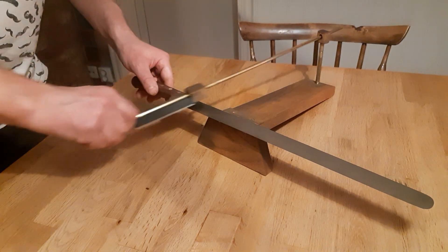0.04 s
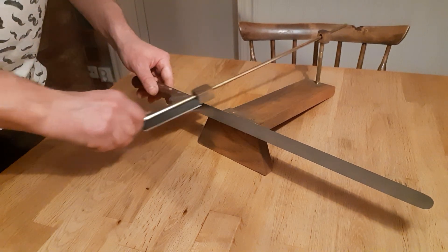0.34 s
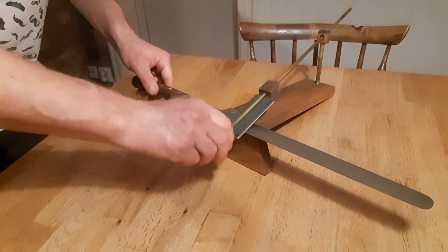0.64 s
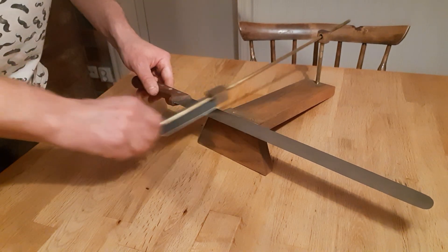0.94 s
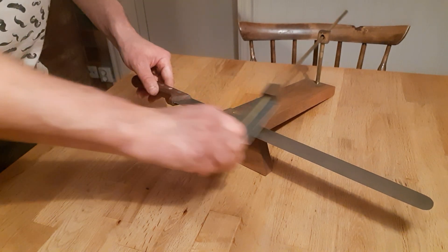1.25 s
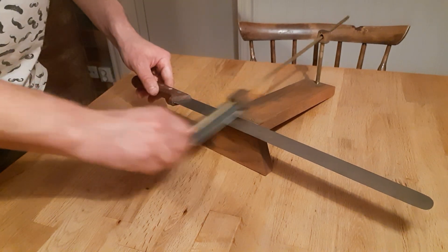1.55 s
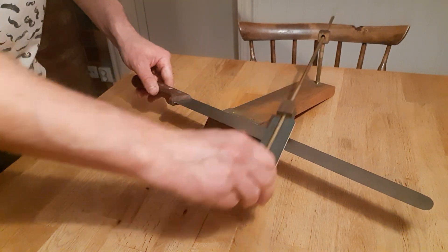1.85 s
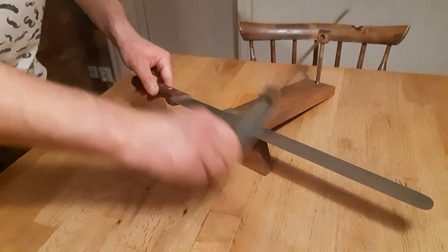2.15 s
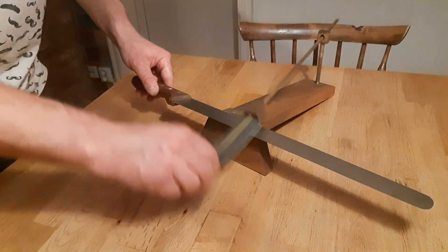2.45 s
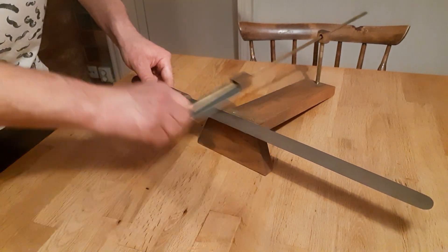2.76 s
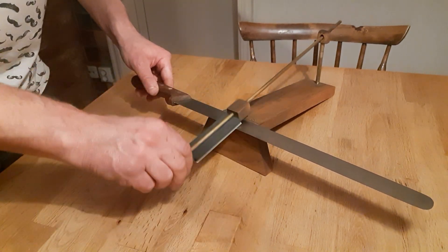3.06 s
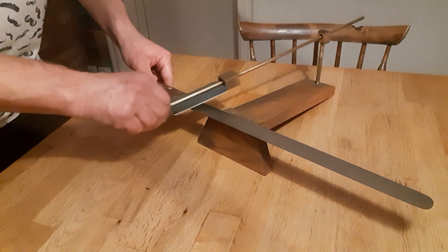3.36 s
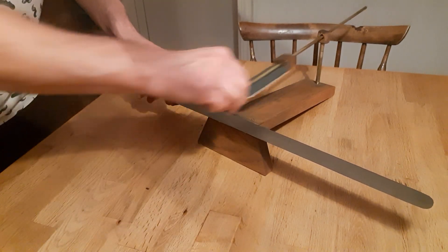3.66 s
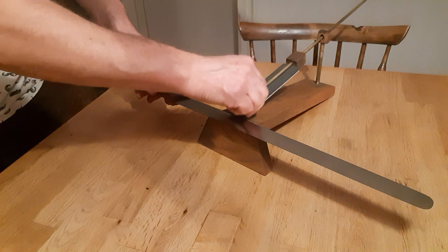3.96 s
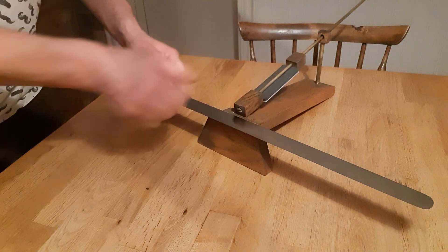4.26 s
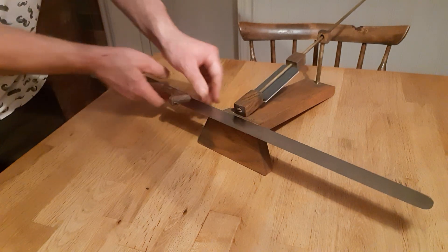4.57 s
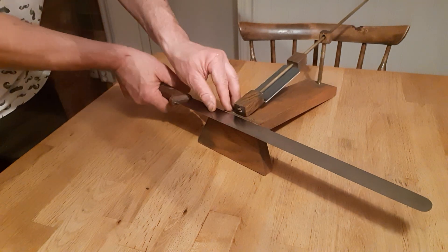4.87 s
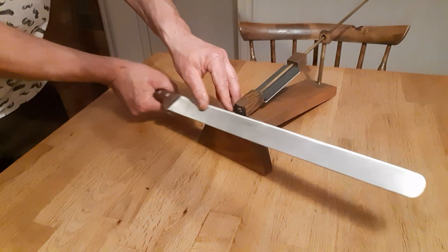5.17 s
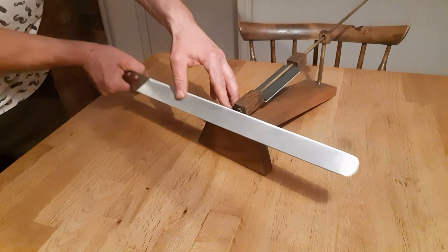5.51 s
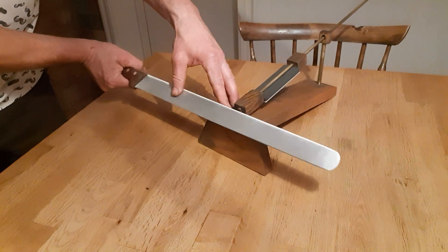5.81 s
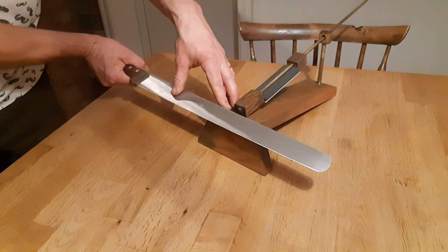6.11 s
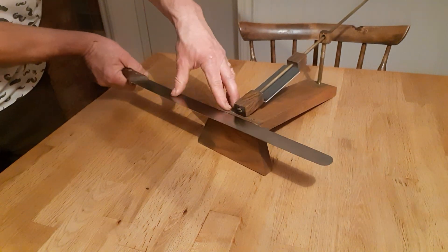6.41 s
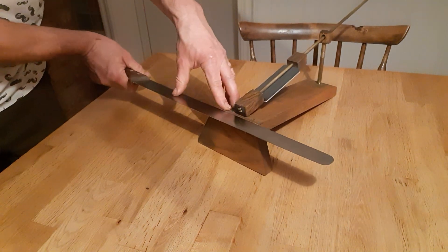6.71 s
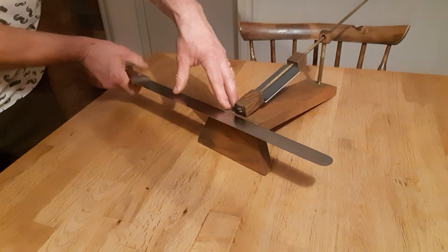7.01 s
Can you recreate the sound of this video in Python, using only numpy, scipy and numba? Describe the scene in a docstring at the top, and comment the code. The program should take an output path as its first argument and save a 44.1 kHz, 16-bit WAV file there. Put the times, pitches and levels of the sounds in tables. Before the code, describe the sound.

A sharpening stone knocks onto a long knife in a wooden jig and scrapes along the edge in quick, gritty strokes, with a slight steel ring and faint squeaks from its guide rod. About halfway through, the strokes end in a sharp clack. The stone is put down, and the knife is shifted with light knocks and rubs. The small room hums faintly, and the brighter sounds sit mostly left.

```python
"""A soft rub and a wooden knock, then a stone on a guide rod lands on a long knife held in a wooden jig
and rasps along the edge: four single strokes, two there and back. The grit hisses and sets the blade
ringing, the rod squeaks, the jig rocks on the kitchen table. The stone is parked, and the knife is lifted
and set back with light knocks. The small room hums faintly; the treble sits mostly on the left."""
import sys
import numpy as np
from scipy import signal
from scipy.fft import rfft, irfft, next_fast_len
from scipy.io import wavfile
from scipy.ndimage import map_coordinates
from numba import njit

SR = 44100
rng = np.random.default_rng(int(sys.argv[2]) if len(sys.argv) > 2 else 0)


def to_wav(s):
    """Save 16-bit WAV."""
    ch = np.atleast_2d(s).T  # columns
    pcm = np.round(np.clip(ch, -1, 1) * 32767)  # PCM
    wavfile.write(sys.argv[1], SR, pcm.astype(np.int16))


N = 310905
T = np.arange(N) / SR

# leftward lean of knocks, rubs and squeaks: f/Hz, left minus right/dB
JIG_PAN = [(60, -7.5), (180, 0.5), (300, 0.5), (450, 3.5), (750, 7.5), (1500, 9), (2500, 17), (4000, 20),
           (6000, 42), (14000, 13)]


def scrape(contact_q=3.0, contact_db=9.5, rasp_trim_db=-2, room_db=-6):
    """Grit hisses on the edge and rasps through the blade, whose resonance slides with the contact."""
    # tone of the grit on the edge: f/Hz, gain/dB
    hiss_eq = [(3000, -39), (7500, -35.5), (8300, -19), (9200, -10.5), (12400, -13), (13800, -6),
               (15600, -2), (17000, -5)]
    # tone of the blade's body: f/Hz, gain/dB
    rasp_eq = [(60, -29), (180, 5.5), (280, 13.5), (550, 3.5), (1000, 3), (1500, -10), (2000, -1),
               (2600, -4), (4000, -5), (5600, -1), (6400, -7.5), (7200, -24), (9000, -50)]
    # leftward lean of the scrape: f/Hz, left minus right/dB
    pan = [(100, 4), (400, 1.5), (1000, 11), (2500, 16.5), (5000, 28), (15000, 31)]
    hiss_gain, rasp_gain, contact_hz = hand()
    grains = grit()
    blade = colour(grains, rasp_eq)
    blade = blade + undb(contact_db) * np.array([resonate(x, contact_hz, contact_q) for x in blade])
    hiss = hiss_gain * unit(stereo(colour(grains, hiss_eq), pan))
    rasp = undb(rasp_trim_db) * rasp_gain * unit(stereo(blade, pan))
    direct = hiss + rasp
    tail = room_tail()
    reverb = signal.fftconvolve(direct, tail / np.linalg.norm(tail[0]), axes=1)[:, :N]
    return direct + undb(room_db) * reverb


def hand(hiss_arch_db=2.7, flick_lead_s=0.053, flick_s=0.013, release_s=0.012):
    """Each pass touches down, arches with the hand's speed, ends in a brisk flick and lifts off."""
    # passes of the stone; a swell runs from start to end, the arch peaks at mid-stroke:
    # t/s, length/s, touch-down/s, hiss/dB, hiss swell/dB, rasp/dB, rasp swell/dB, rasp arch/dB,
    # hiss flick/dB, starting resonance/Hz, final resonance/Hz
    strokes = [ (0.393, 0.31, 0.001, -55.5, -2.5, -61, -20.5, 2, 2, 2310, 4660),
               (0.977, 0.25, 0.001, -53, -7.5, -61.5, -17.5, 2, 4, 2690, 5600),
               (1.484, 0.27, 0.001, -60, 4, -66.5, 4.5, 5, 3.5, 3500, 4700),
               (1.996, 0.06, 0.001, -61.5, -1, -57, -8.5, -3.5, -2, 2130, 2500),
               (2.064, 0.22, 0.001, -59, 6, -64, 8, 8.5, -5, 4200, 5500),
               (2.474, 0.098, 0.0032, -59, -8, -64.5, -10.5, 3.5, 3, 4070, 6030),
               (2.58, 0.26, 0.028, -59.5, 5.5, -63.5, 11.5, 6.5, 7, 6060, 3180),
               (2.888, 0.19, 0.002, -53, -12.5, -68, -13.5, 7, 3, 2840, 4800),
               (3.085, 0.21, 0.025, -64.5, 10.5, -64, 12, 1, 0, 4900, 2860),
               (3.286, 0.022, 0.004, -39.5, -15, -50, 8, 13.5, 0, 2700, 2690), ]
    hiss, rasp = np.zeros((2, N))
    contact_hz = np.full(N, float(strokes[0][-2]))
    for (s, length, touch_s, hiss_db, hiss_swell, rasp_db, rasp_swell, arch_db,
         flick_db, from_hz, to_hz) in strokes:
        along = np.clip((T - s) / length, 0, 1)
        past_end = T - s - length
        touching = np.clip((T - s) / touch_s, 0, 1) * np.exp(-np.maximum(past_end, 0) / release_s)
        speed = np.sin(np.pi * along)
        flick = np.exp(-((past_end + flick_lead_s) / flick_s) ** 2)
        hiss += touching * undb(hiss_db + hiss_swell * along + hiss_arch_db * speed + flick_db * flick)
        rasp += touching * undb(rasp_db + rasp_swell * (along - .5) + arch_db * speed)
        contact_hz = np.where(T >= s, from_hz * (to_hz / from_hz) ** along, contact_hz)
    pressure = undb(3.15 * wander(rate_hz=35.24))  # the hand bears down unevenly
    return hiss * pressure, rasp * pressure, contact_hz


def grit(grain_db=2.6, cap_db=13, judder_db=0.8, patchy_db=3.9, spacing_hz=130, dwell_s=0.037):
    """Fine grains merge into hiss; close modes of stone and blade swell and fade as the contact moves."""
    # grain loudness is capped so the hiss stays even, without single ticks
    grain = np.minimum(grain_db * rng.exponential(size=N), cap_db)
    bites = rng.standard_normal((2, N)) * undb(grain + judder_db * wander(rate_hz=150))
    hz, s, spectra = signal.stft(bites, SR, nperseg=1024)
    places = np.meshgrid(hz / spacing_hz, s / dwell_s, indexing='ij')
    coupling = map_coordinates(rng.standard_normal((512, 512)), places, order=1, mode='wrap')
    return signal.istft(spectra * undb(patchy_db * coupling), SR, nperseg=1024)[1][:, :N]


def knocks(trims_db=(-1, -4, -1)):
    """The stone lands on the edge and is parked; the blade is lifted and set back on its rest."""
    # hard contacts of stone, blade and jig:
    # t/s, thud/dB, clack/dB, tick/dB, wood resonance/Hz, blade resonance/Hz, tick resonance/Hz, rise/s
    contacts = [ (0.164, -45, -46, -77, 260, 740, 5000, 0.0032),
                (0.17, -37, -49, -51.5, 221, 2210, 5540, 0.0038),
                (0.393, -48, -41, -53.5, 233, 1434, 3730, 0.0029),
                (0.956, -51, -60.5, -84, 292, 840, 5000, 0.0015),
                (0.977, -38.5, -40.5, -52.5, 96.7, 1700, 3830, 0.00021),
                (1.03, -52, -46, -53.5, 303, 2450, 4060, 0.0004),
                (1.482, -38.5, -43.5, -52.5, 217, 1670, 3150, 0.0016),
                (1.673, -46, -46.5, -58, 233, 1430, 5750, 0.00063),
                (1.995, -51.5, -55, -84, 180, 2150, 3300, 0.0083),
                (2.062, -54, -46, -54, 264, 2330, 3280, 0.0003),
                (2.889, -52.5, -56.5, -64, 145, 1580, 3750, 0.02),
                (3.246, -48.5, -53.5, -58.5, 255, 2360, 3700, 0.0034),
                (3.294, -35.5, -34.5, -41, 239, 1113, 3000, 0.00014),
                (4.012, -39, -45, -59, 332, 1210, 4040, 0.00038),
                (4.024, -38.5, -47, -64, 458, 2370, 5100, 0.0072),
                (4.622, -57, -60.5, -87, 182, 1320, 5140, 0.0056),
                (5.915, -40.5, -43.5, -63.5, 339, 753, 3130, 0.0058),
                (5.966, -53, -54, -64, 420, 1540, 3170, 0.00025),
                (6.403, -40.5, -43, -63.5, 402, 1150, 3630, 0.0034),
                (6.688, -53, -43.5, -64.5, 243, 907, 4730, 0.00052), ]
    return sum(strike(s, np.add((thud, clack, tick), trims_db), wood_hz, blade_hz, tick_hz, rise_s)
               for s, thud, clack, tick, wood_hz, blade_hz, tick_hz, rise_s in contacts)


def bumps(thud_trim_db=-1, clack_trim_db=-3, tick_trim_db=-10.5):
    """The jig rocks under the hands, and once the blade is lifted softly off its rest: mostly one resonance of
    the wood, with little of the blade."""
    # soft bumps on the table, and at 5.06 s the blade lifted off its rest: t/s, thud/dB, clack and tick/dB,
    # wood resonance/Hz
    rocking = [ (0.071, -59, -72, 300), (0.656, -59, -82, 293), (0.879, -59.5, -68.5, 293),
               (1.418, -53, -66, 285), (2.233, -50, -65, 302), (2.473, -44.5, -79, 230),
               (4.648, -51, -64, 200), (5.06, -44.5, -72.5, 259), (5.551, -62.5, -75, 230),
               (6.453, -46.5, -81, 416), (6.875, -57.5, -77, 278), (6.982, -59.5, -75, 278), ]
    out = np.zeros((2, N))
    for s, thud, metal, wood_hz in rocking:
        levels_db = thud + thud_trim_db, metal + clack_trim_db, metal + tick_trim_db
        out += strike(s, levels_db, wood_hz, blade_hz=820, tick_hz=4840, rise_s=0.0033, wood_ring_db=-1)
    return out


def strike(s, levels_db, wood_hz, blade_hz, tick_hz, rise_s, wood_ring_db=-4, swell_s=0.0044):
    """Blade clack and steel tick speak at once; the thud of the heavy table top swells just behind."""
    hit = impact()
    n, start = hit.shape[1], int(s * SR)
    hit = hit * (1 - np.exp(-T[:n] / rise_s))  # a soft contact builds up slowly
    thud = emphasise(band(hit, 22, 580), wood_hz, q=7, db=wood_ring_db)
    thud *= 1 - np.exp(-T[:n] / swell_s)
    clack = emphasise(band(hit, 620, 2800), blade_hz, q=14, db=-4)
    tick = emphasise(band(hit, 2900, 18000), tick_hz, q=12, db=-4)
    sound = sum(unit(part, size=1323) * undb(db) for part, db in zip((thud, clack, tick), levels_db))
    return np.pad(sound, ((0, 0), (start, max(N - start - n, 0))))[:, :N]


def impact(crack_db=9, crack_s=0.0028, ring_db=-2, scatter_db=3, size=32768):
    """A short crack and its reflections, over modes whose shares depend on the spot struck."""
    # tone of the crack and its reflections: f/Hz, gain/dB
    clatter_eq = [(25, -71), (65, -21), (105, 5.5), (250, 3.5), (490, -7.5), (590, -7.5), (760, 1.5),
                  (1100, -2), (1450, -9), (2550, -18.5), (3050, -26.5), (5500, -25.5), (7400, -44),
                  (15000, -34)]
    # ringing of jig, blade and table top: f/Hz, t60/s, level/dB
    modes = [(129, 0.76, -12), (176.6, 0.39, 2.5), (221.5, 0.44, -22.5), (270.9, 0.44, -2.5),
             (314.2, 0.28, -2.5), (395.2, 0.39, -7), (491.6, 0.46, -7), (773, 0.11, 0), (900, 0.069, -7),
             (997, 0.42, -4.5), (1080, 0.14, -50), (1253, 0.51, -13.5), (1568, 0.4, -21),
             (1713, 0.057, -11.5), (1900, 0.25, -10.5), (2150, 0.48, -20.5), (2440, 0.55, -29.5),
             (2516, 0.14, -13), (4970, 0.1, -26.5), (5500, .18, -35)]
    t = T[:size]
    crack = rng.standard_normal((2, size)) * np.exp(-t / crack_s)
    clatter = colour(room_tail(size) + undb(crack_db) * crack, clatter_eq)
    hz, t60, db = np.transpose(modes)
    shares = undb(db + scatter_db * rng.standard_normal((2, len(hz))))
    shares *= rng.choice([-1, 1], shares.shape)
    partials = np.sin(2 * np.pi * hz[:, None] * t) * np.exp(-np.log(1000) * t / t60[:, None])
    return stereo(unit(clatter) + undb(ring_db) * unit(shares @ partials), JIG_PAN)


def emphasise(x, hz, q, db, size=2205):
    """The spot that is struck drives one resonance harder than the rest."""
    ring = signal.lfilter(*signal.iirpeak(hz, q, fs=SR), x)
    return unit(x, size) + undb(db) * unit(ring, size)


def slides(rise_share=0.21, uneven_db=2):
    """Faint, uneven rubs of the rod in its guide and the blade on its rest start briskly and die away."""
    # bands of friction noise: t/s, length/s, centre/Hz, width/Hz, level/dB
    rubs = [ (0.0, 0.42, 630, 355, -63), (0.87, 0.096, 790, 885, -68.5), (3.676, 0.18, 2670, 1070, -72),
            (4.62, 0.19, 5030, 910, -78), (5.98, 0.23, 3330, 1190, -71.5), (6.14, 0.84, 276, 244, -64.5),
            (6.685, 0.15, 287, 357, -61), ]
    grains = stereo(grit() * undb(uneven_db * wander(rate_hz=25)), JIG_PAN)
    out = np.zeros((2, N))
    for s, length, hz, width, db in rubs:
        speed = np.interp((T - s) / length, [0, rise_share, 1], [0, 1, 0])
        rub = band(grains, hz - width / 2, hz + width / 2, order=2)
        out += undb(db) * np.sqrt(speed) * unit(rub)
    return out


def squeaks(rise_share=0.24, sag_share=0.05, q=12.0):
    """Friction drives one narrow resonance of the rod or the stone, which sags as the rubbing slows."""
    # thin squeaks of the rod in its guide (first two: rings of the stone as it rubs): t/s, length/s, starting
    # pitch/Hz, level/dB
    cues = [(2.484, 0.1, 1580, -68), (2.882, 0.095, 1660, -58), (3.493, 0.33, 2590, -74.5),
            (3.686, 0.15, 1370, -77.5)]
    friction = stereo(rng.standard_normal((2, N)), JIG_PAN)
    out = np.zeros((2, N))
    for s, length, hz, db in cues:
        along = np.clip((T - s) / length, 0, 1)
        pitch = hz * (1 - sag_share * along)
        ring = np.array([resonate(resonate(x, pitch, q), pitch, q) for x in friction])
        speed = np.interp(along, [0, rise_share, 1], [0, 1, 0])
        out += undb(db) * np.sqrt(speed) * unit(ring)
    return out


def room_tail(size=32768):
    """Dense reflections of the small room, each band dying at its own pace."""
    # decay of the room: f/Hz, t60/s
    decays = [(60, 0.85), (150, 0.32), (500, 0.47), (1200, 0.38), (2500, 0.31), (5000, .36), (12000, 0.25)]
    centres, t60s = np.transpose(decays)
    hz = np.fft.rfftfreq(size, 1 / SR)
    noise = rfft(rng.standard_normal((2, size)))
    out = np.zeros((2, size))
    for t60, share in zip(t60s, np.eye(len(decays))):
        weight = curve(np.c_[centres, share], hz)
        out += irfft(noise * weight) * np.exp(-np.log(1000) * T[:size] / t60)
    return out


def room_tone(air_db=-65, waver_db=1.2, drift_rad=0.35):
    """A bed of still air and the slowly wavering hum of an appliance."""
    # tone of the air: f/Hz, gain/dB
    air_eq = [(15, -33), (25, -29), (70, -16.5), (107, -5.5), (130, -4), (179, -15), (333, -25),
              (587, -25.5), (929, -29), (1010, -30.5), (1150, -32.5), (2970, -38.5), (3220, -36),
              (5370, -41.5), (15800, -37.5)]
    # balance of the air: f/Hz, left minus right/dB
    pan = [(40, 3), (120, -2.5), (240, 11), (400, -0.5), (650, 9), (1200, 2.5), (14000, 0.5)]
    # partials of the hum: f/Hz, level/dB
    partials = [(102.3, -86), (118.4, -74.5), (258.4, -83.5), (500.6, -90.5), (592.2, -87)]
    air = unit(stereo(colour(rng.standard_normal((2, N)), air_eq), pan))
    hum = np.zeros(N)
    for hz, db in partials:
        peak = np.sqrt(2) * undb(db + waver_db * wander(rate_hz=1.2))
        hum += peak * np.sin(2 * np.pi * hz * T + drift_rad * wander(rate_hz=1.7))
    return undb(air_db) * air + hum


def stereo(pair, pan):
    """Two unrelated signals become left and right: alike in the bass, wide above, panned by frequency."""
    # likeness of the two channels: f/Hz, correlation
    likeness = [(80, 0.83), (160, 0.87), (300, 0.62), (600, 0.24), (1500, 0.023), (5000, 0.013)]
    n = next_fast_len(pair.shape[1] + SR // 10)
    left, other = rfft(pair, n)
    hz = np.fft.rfftfreq(n, 1 / SR)
    alike = curve(likeness, hz)
    right_gain = undb(-curve(pan, hz))
    right = right_gain * (alike * left + np.sqrt(1 - alike ** 2) * other)
    return irfft(np.array([left, right]) / (1 + right_gain), n)[:, :pair.shape[1]]


def colour(x, points, size=4096):
    """Minimum-phase EQ through (f/Hz, gain/dB) points."""
    gain = undb(curve(points, np.fft.rfftfreq(size, 1 / SR)))
    cepstrum = irfft(np.log(gain))
    cepstrum[1:size // 2] *= 2
    cepstrum[size // 2 + 1:] = 0
    impulse = irfft(np.exp(rfft(cepstrum)))
    return signal.fftconvolve(x, impulse[None], axes=1)[:, :x.shape[1]]


@njit
def resonate(x, hz, q):
    """State-variable band-pass whose centre can sweep every sample."""
    y, band_state, low_state = np.empty(len(x)), 0., 0.
    for i in range(len(x)):
        g = np.tan(np.pi * hz[i] / SR)
        v = (band_state + g * (x[i] - low_state)) / (1 + g * (g + 1 / q))
        band_state = 2 * v - band_state
        low_state += 2 * g * v
        y[i] = v / q
    return y


def band(x, low_hz, high_hz, order=3):
    """Causal band-pass."""
    return signal.sosfilt(signal.butter(order, [low_hz, high_hz], 'band', fs=SR, output='sos'), x)


def wander(rate_hz):
    """Smooth random modulation with a spread near 1."""
    knots = rng.standard_normal(N // 10)
    return np.interp(T * rate_hz, np.arange(len(knots)), knots)


def curve(points, hz):
    """Interpolate (f/Hz, value) points on a log-frequency axis."""
    f, value = np.transpose(points)
    return np.interp(np.log(hz + 1), np.log(f), value)


def unit(x, size=None):
    """Scale the mono mix to rms 1, over the first size samples if given."""
    return x / np.sqrt(np.mean(x.mean(0)[:size] ** 2))


def undb(db):
    """Decibels to gain."""
    return 10 ** (np.asarray(db) / 20)


def scene():
    """Strokes, knocks and handling in the quiet room."""
    return scrape() + knocks() + bumps() + slides() + squeaks() + room_tone()


def record(dry):
    """The recorder cuts the top steeply."""
    top_hz = 15850
    return signal.sosfilt(signal.ellip(12, .2, 70, top_hz, fs=SR, output='sos'), dry)


dry = scene()
out = record(dry)
to_wav(out)
```